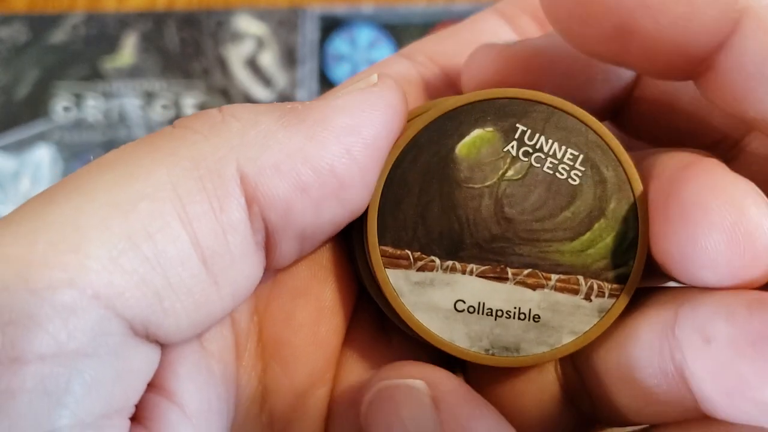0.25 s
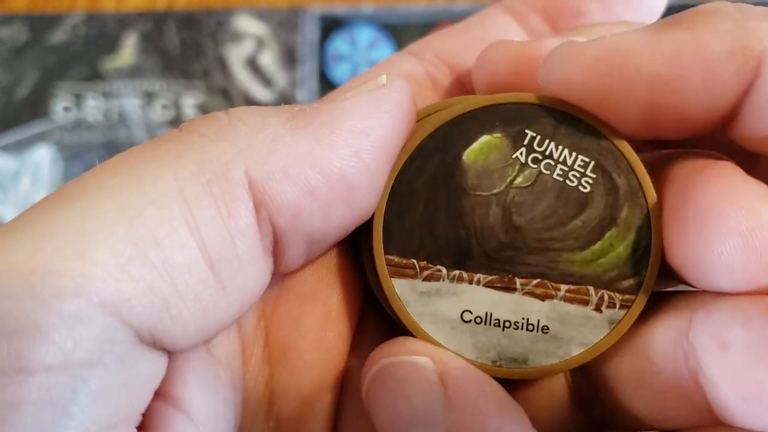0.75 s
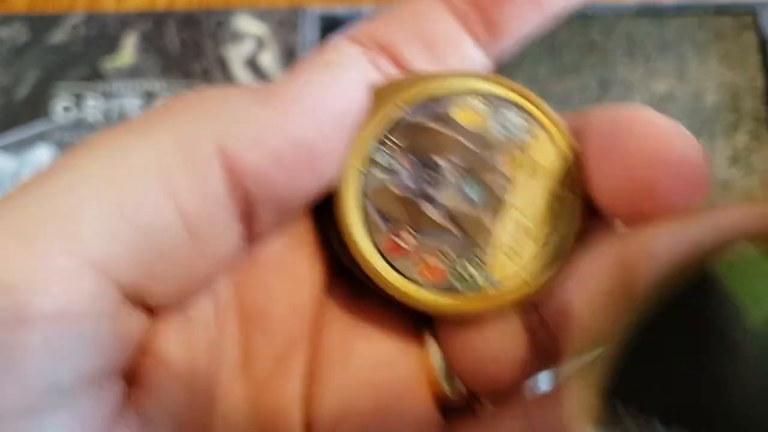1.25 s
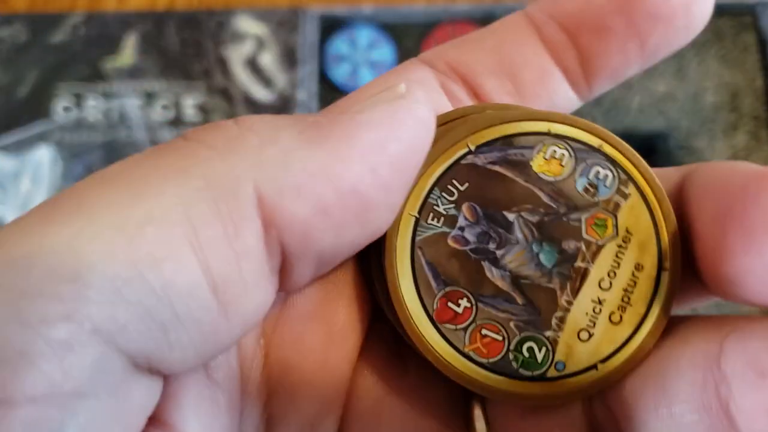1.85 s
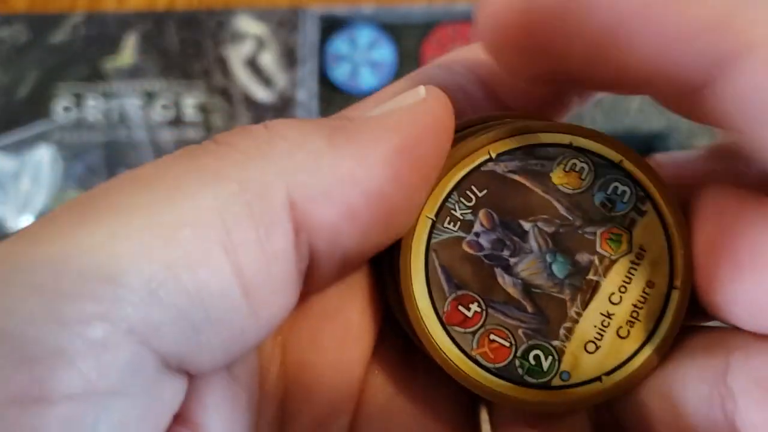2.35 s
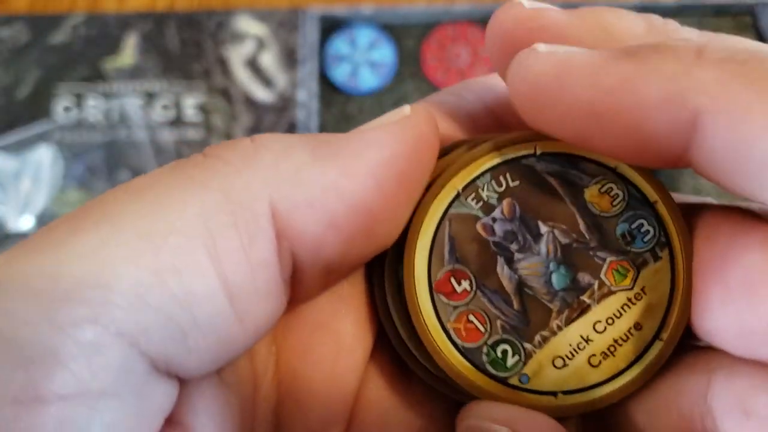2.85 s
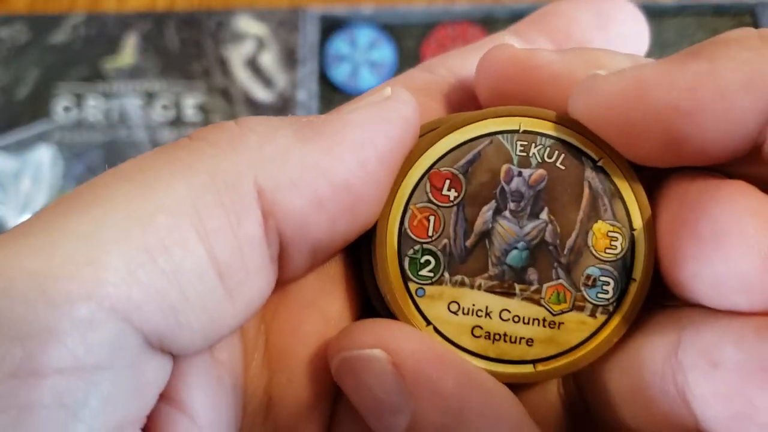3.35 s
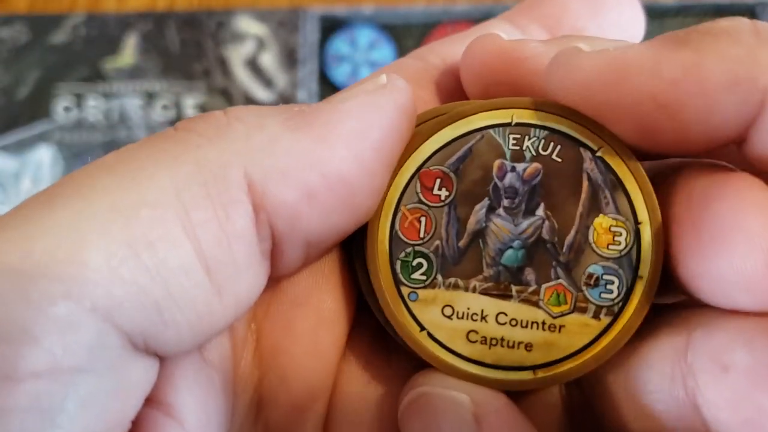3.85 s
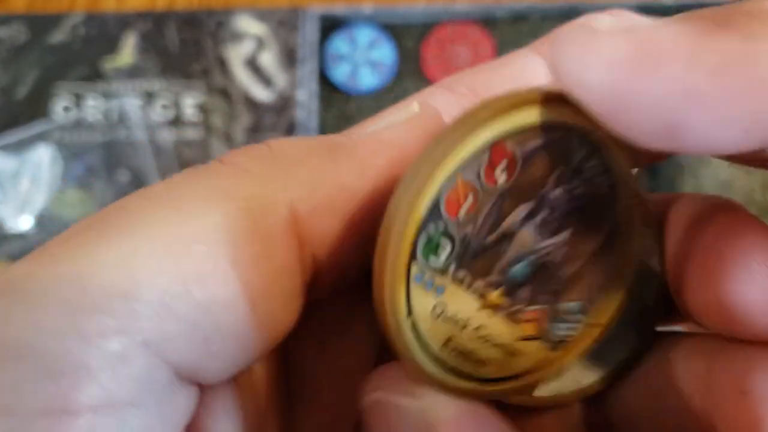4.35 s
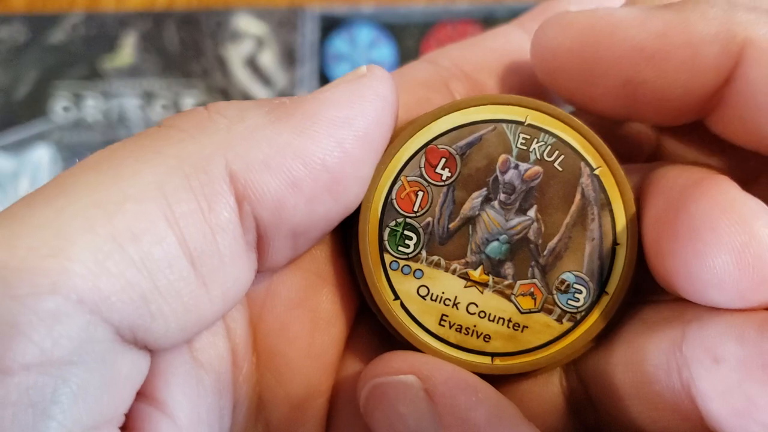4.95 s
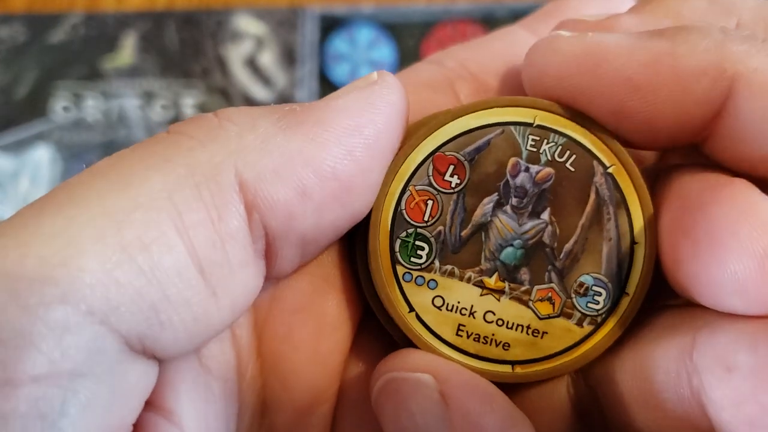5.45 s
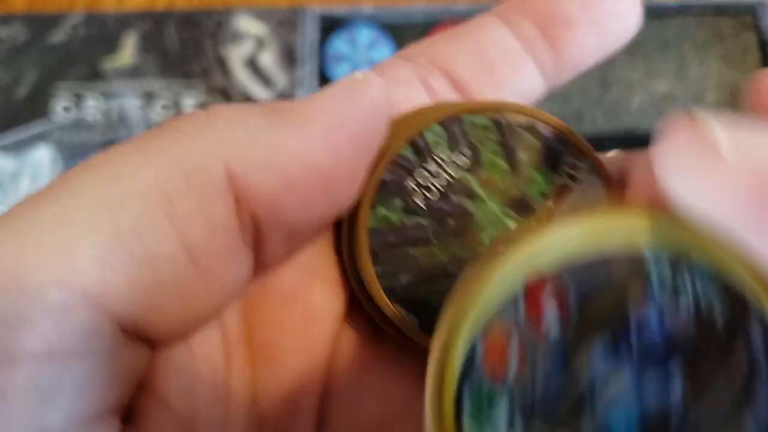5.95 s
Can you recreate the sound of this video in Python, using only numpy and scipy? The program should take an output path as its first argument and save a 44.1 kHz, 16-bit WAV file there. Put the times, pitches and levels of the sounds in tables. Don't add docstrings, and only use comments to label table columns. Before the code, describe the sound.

Thick plastic chips click and grind softly in a hand, one clatters down on a table, then loud clacks in a quiet room.

```python
import sys
import numpy as np
from scipy import signal
from scipy.fft import rfft, irfft, next_fast_len
from scipy.io import wavfile
from scipy.ndimage import uniform_filter1d

SR = 44100
rng = np.random.default_rng(int(sys.argv[2]) if len(sys.argv) > 2 else 0)


def bounce(signal):
    frames = np.transpose(np.atleast_2d(signal))
    limited = np.clip(frames, -1, 1)
    pcm = np.round(limited * 32767).astype(np.int16)
    wavfile.write(sys.argv[1], SR, pcm)


def level_to_linear(level):
    exponent = np.asarray(level, float) / 20
    return 10 ** exponent


N = 273420
HISS_TOP_HZ = 14750


def unit(x):
    return x / np.sqrt(np.mean(x ** 2) + 1e-20)


def along(points, hz):
    f, v = np.transpose(points)
    return np.interp(np.log(hz + 1), np.log(f + 1), v)


def filtered(x, response):
    size = next_fast_len(x.shape[-1] + 8192)
    spectrum = rfft(x, size) * response(np.fft.rfftfreq(size, 1 / SR))
    return irfft(spectrum, size)[..., :x.shape[-1]]


def sides(pan_db):
    return level_to_linear(np.array([pan_db, -pan_db]) / 2)


def add(track, start, x, lag=0):
    track[0, start:start + x.shape[1]] += x[0]
    track[1, start + lag:start + lag + x.shape[1]] += x[1]


def swell(peak_s, attack_s, release_s):
    t = np.arange(-round(attack_s * SR), round(release_s * SR)) / SR
    gain = level_to_linear(-30 * np.maximum(-t / attack_s, t / release_s))
    return round((peak_s + t[0]) * SR), gain


def ring(modes, seconds, spread_db, attack_s, crack_db):
    t = np.arange(round(seconds * SR)) / SR
    hz, db, t60 = np.transpose(modes)[:, :, None]
    luck = rng.standard_normal((3, 2, len(modes), 1))
    tones = np.sin(2 * np.pi * hz * (1 + 0.011 * luck[0, 0]) * t + 2 * luck[1])
    width = round(2 * SR / hz.mean())
    scrape = rng.standard_normal((2, 1, len(t)))
    for _ in range(2):
        scrape = uniform_filter1d(scrape, size=width)
    shape = level_to_linear(-60 * t / t60) + unit(scrape) * level_to_linear(crack_db - 60 * t * hz.mean() / 25)
    out = (level_to_linear(db + spread_db * luck[2]) * shape * tones).sum(1)
    out = out * (1 - np.exp(-(t / attack_s) ** 2))
    return out / np.abs(out).max(1, keepdims=True)


def lasts(modes):
    return .22 if modes[0][0] < 450 else .05


def grit(n, per_second, spread_db):
    taps = (rng.random(n) < per_second / SR) * level_to_linear(spread_db * rng.standard_normal(n))
    return unit(taps) * rng.standard_normal((2, n)) + .5 * rng.standard_normal((2, n))


def excite(force, modes, crack_db):
    modal = ring(modes, lasts(modes), spread_db=1.0, attack_s=0.00022, crack_db=crack_db)
    return unit(signal.fftconvolve(force, modal, axes=1)[:, :force.shape[1]])


# f/Hz, correlation
PORT_LIKENESS = [(60, 0.89), (130, 0.89), (290, 0.77), (640, 0.3), (1410, 0.04), (3100, 0.01),
                 (6820, -0.02), (15000, 0.02)]
# f/Hz, left-right level/dB
PORT_LEAN = [(60, -1.0), (110, 0), (200, -0.5), (380, 2), (700, 2.5), (1290, 5), (2380, 3), (4400, 3.5),
             (8120, 6.5), (15000, -4)]


def noise(spectrum):
    def mid_side(hz):
        turn = np.arccos(np.clip(along(PORT_LIKENESS, hz), -1, 1)) / 2
        return level_to_linear(along(spectrum, hz)) * [np.cos(turn), np.sin(turn)]
    mid, side = filtered(rng.standard_normal((2, N)), mid_side)
    return unit(filtered(np.array([mid + side, mid - side]), lambda hz: sides(along(PORT_LEAN, hz))))


# f/Hz, level/dB per Hz
RUMBLE_SPECTRUM = [(15, -56.5), (25, -22), (59, -4.5), (82, -1), (124, -4.5), (192, -22), (207, -13),
                   (227, -7), (248, -27), (306, -22.5), (465, -29.5), (509, -27.5), (900, -39), (1170, -70),
                   (1980, -120)]
# t/s, level/dB
RUMBLE_LEVEL = [(0.0, -68.5), (0.41, -66.5), (0.81, -71.5), (0.95, -63.5), (1.07, -68.5), (2.73, -67.5),
                (2.81, -71.5), (2.97, -65), (3.14, -68), (4.16, -70.5), (4.28, -65.5), (4.42, -70),
                (4.77, -63.5), (5.09, -68), (5.5, -67), (5.63, -70), (5.9, -70.5), (6.2, -68)]
# t/s, level/dB
MOTOR_LEVEL = [(0, -90.5), (3.9, -89.5), (4.3, -77), (5.4, -82), (5.7, -93), (6.2, -91)]
# f/Hz, level/dB per Hz
HISS_SPECTRUM = [(500, -12), (700, -6), (1500, -8.5), (3000, -10.5), (6300, -16), (7300, -8.5), (8500, -17),
                 (9500, -15), (11500, -7.5), (13900, -7), (14600, -9.5)]


def background():
    t = np.arange(N) / SR
    level = level_to_linear(np.interp(t, *np.transpose(RUMBLE_LEVEL)))
    start, shake = swell(1.96, attack_s=0.25, release_s=0.24)
    level[start:start + len(shake)] += level_to_linear(-55) * shake
    rumble = level_to_linear(2.0) * level * noise(RUMBLE_SPECTRUM)
    motor_gain = level_to_linear(np.interp(t, *np.transpose(MOTOR_LEVEL)))
    motor = motor_gain * noise([(160, -40.5), (174, -1), (190, -39.5), (300, -120)])
    drone = level_to_linear(-80) * np.sin(2 * np.pi * 222.5 * t)
    drone = drone + level_to_linear(-86) * noise([(205, -40), (222, -0.5), (240, -40.5), (400, -120)])
    hiss = level_to_linear(-76) * filtered(noise(HISS_SPECTRUM), lambda hz: hz < HISS_TOP_HZ)
    return rumble + motor + drone + hiss


# f/Hz, level/dB, t60/s
CHIP_RING = [(6220, -5, 0.009), (6960, 0, 0.016), (7190, -2, 0.014), (7680, -13.5, 0.01),
             (8070, -17, 0.0066)]
# peak t/s, hiss level/dB, attack t/s, left-right level/dB
SLIDES = [
    (1.293, -63.5, .06, -5),
    (2.452, -70.5, .05, -3),
    (3.15, -76.5, 0.11, 10),
    (3.353, -65, 0.019, -10),
    (3.62, -69, 0.19, 3.5),
    (4.428, -71, 0.12, 2),
    (4.63, -64, 0.025, 8),
]


def slides():
    out = np.zeros((2, N + SR))
    for s, db, attack_s, pan_db in SLIDES:
        start, gain = swell(s, attack_s, release_s=.13)
        force = grit(SR // 3, per_second=6000, spread_db=3.0)
        skin = unit(filtered(force, lambda hz: (hz < HISS_TOP_HZ) / (1 + (9500 / (hz + 1)) ** 6)))
        rub = skin + level_to_linear(-17) * excite(force, CHIP_RING, crack_db=-4.5)
        add(out, start, level_to_linear(db) * gain * rub[:, -len(gain):] * sides(pan_db)[:, None])
    return out[:, :N]


# from t/s, body f/Hz, body level/dB, top modes level/dB, left-right level/dB
GRIPS = [(0, 1595, -2, -7, 18), (2.4, 1680, 11, -1, 16), (2.52, 2050, 13, -14, 16.5),
         (2.72, 3690, -22, -18, 24), (2.8, 940, -25, -25, 14.5), (3.3, 1500, -7, 18, 21),
         (3.45, 2200, 6, -16.5, 12.5), (3.8, 1300, -12, -19, 13), (4.2, 2104, 10, -7, -1.5),
         (4.37, 1890, 10, 4, 5), (4.55, 2200, -10, -4, 5), (4.7, 2800, -17.5, -14, 12),
         (4.811, 2790, -20, -12.5, 6), (4.835, 3100, -21.5, -8, 8), (5.3, 3450, 2, 3, 6)]


def grip(s):
    return [row for row in GRIPS if row[0] <= s][-1][1:]


# pitch ratio to body f/Hz, level/dB, t60/s
STACK_MODES = [(.45, -4, 0.00591), (.65, -6.5, 0.0065), (.83, 2, 0.0087), (1, 5, 0.013), (1.2, -4, .008),
               (1.45, -8, .005), (1.8, -9, 0.0044)]


def body(hz):
    return [(ratio * hz, db, t60) for ratio, db, t60 in STACK_MODES]


# f/Hz, level/dB, t60/s
CHIP_FIVE = [(4590, -5, 0.0078), (4963, -3, 0.016), (5400, -3.5, 0.01), (6270, -5, 0.0065)]
# f/Hz, level/dB, t60/s
CHIP_TOP = [(9800, 0, 0.011), (10940, 2.5, 0.0045), (11990, -1.5, 0.0078), (12700, -6, .004),
            (14390, -5, 0.0065)]
# f/Hz, level/dB, t60/s
PALM = [(776, -19, 0.025), (950, -5.5, .008)]
# t/s, 7 kHz ring level/dB, 5 kHz modes over it/dB
CONTACTS = [(1.5024, -66, -19), (2.4554, -70, -16), (2.5675, -59, -2), (2.746, -55, -19), (2.8514, -82, 14),
            (3.3534, -94, 0), (3.5172, -53.5, 0.5), (3.5206, -42.5, 6.5), (3.5231, -55, 2.5),
            (3.8844, -79, 12), (4.3164, -63, -6), (4.4214, -60, -2), (4.6037, -36, 1), (4.6043, -28, 3),
            (4.6052, -37.5, 3), (4.8020, -22, -5.5), (4.8050, -22.5, -0.5), (4.8185, -12, -6),
            (4.8272, -28, 6), (4.8293, -8, -11), (4.8316, -8, -13.5), (4.8378, -21.5, -1),
            (4.8384, -12.5, 6.5), (4.8426, -23.5, 5.5), (5.7378, -48, 9.5), (5.741, -59, 9.5)]
# t/s, level/dB
PALM_SLAPS = [
    (4.822, -46.5),
    (4.840, -44),
]


def clicks():
    def hit(modes, crack_db):
        return ring(modes, 0.039, spread_db=2.0, attack_s=0.00022, crack_db=crack_db)
    out = np.zeros((2, N + SR))
    for s, db, five_db in CONTACTS:
        body_hz, body_db, top_db, pan_db = grip(s)
        blow = hit(CHIP_RING, crack_db=-7.5) + level_to_linear(five_db) * hit(CHIP_FIVE, crack_db=-4)
        held = level_to_linear(body_db) * hit(body(body_hz) + PALM, crack_db=-2)
        held += level_to_linear(top_db) * hit(CHIP_TOP, crack_db=4)
        blow += level_to_linear(max(five_db, 0)) * held
        add(out, round(s * SR), level_to_linear(db) * blow * level_to_linear([[0], [-pan_db]]), lag=14)
    for s, db in PALM_SLAPS:
        slap = ring(PALM[:1], .05, spread_db=0, attack_s=.002, crack_db=-9)
        add(out, round(s * SR), level_to_linear(db) * slap * level_to_linear([[0], [-12]]))
    return signal.sosfilt(signal.butter(3, 560, "high", fs=SR, output="sos"), out[:, :N])


# f/Hz, level/dB, t60/s
CHIP_LOW = [(1780, 1, 0.008), (2050, 3.5, 0.0074), (2520, 2, .006), (3100, -8, .004), (3600, -11, 0.0046),
            (4350, -3.5, .005)]
# f/Hz, level/dB, t60/s
TABLE_LEGS = [(138, 1, 0.16), (190, -2.5, .04)]
# f/Hz, level/dB, t60/s
TABLE_FRAME = [(264, -5.5, 0.067), (311, -6.5, 0.14), (353, -4.5, 0.087), (406, -5.5, .08)]
# f/Hz, level/dB, t60/s
TABLE_TOP = [(500, -0.5, 0.029), (650, 3.5, 0.025), (856, -4, 0.018), (1030, -7.5, 0.015),
             (1230, 0.5, 0.045), (1445, -2.5, 0.011)]
# t/s, 7 kHz ring level/dB, table level/dB, top modes level/dB
BOUNCES = [(1.8628, -18.5, 0.5, -28), (1.8705, -29, -5, -29), (1.8872, -26.5, 7.5, -16),
           (1.9084, -16, -14, -5), (1.9107, -10.5, -4.5, -15.5), (1.9156, -8, -13.5, -19.5),
           (1.9371, -13.5, -13.5, -13.5), (1.949, -23, -11, -18), (1.9675, -21.5, -4.5, -14.5),
           (1.9802, -29, -5, -13.5), (1.9943, -31, -2.5, -13), (2.013, -32, 5, -1),
           (2.0357, -29, -1.5, -17), (2.0676, -22.5, 3, 1.5), (2.0902, -30, -2, -16.5),
           (2.0951, -37.5, -3, -8.5), (2.1159, -38, 10, -2), (2.1374, -38, 5, -1)]


def bounces():
    def hit(modes):
        blow = ring(modes, lasts(modes), spread_db=4.0, attack_s=.0008, crack_db=3)
        return np.pad(blow, ((0, 0), (0, SR // 4)))[:, :SR // 4]
    out = np.zeros((2, N + SR))
    for s, db, table_db, top_db in BOUNCES:
        blow = hit(CHIP_RING) + level_to_linear(-11) * hit(CHIP_LOW + CHIP_FIVE[::2]) + level_to_linear(top_db) * hit(CHIP_TOP)
        blow += level_to_linear(table_db - 3.5) * hit(TABLE_LEGS + TABLE_FRAME + TABLE_TOP)
        pan_db = -2 + 35 * (s - BOUNCES[0][0])
        add(out, round(s * SR), level_to_linear(db + 2.5) * sides(pan_db)[:, None] * blow)
    return out[:, :N]


# t/s, level/dB
RATTLE = [
    (1.865, -32),
    (1.901, -40),
    (1.913, -24),
    (1.935, -28),
    (2.057, -38),
    (2.067, -28),
    (2.121, -35.5),
    (2.259, -71.5),
    (2.56, -112),
]


def rattle():
    out = np.zeros((2, N + SR))
    t = np.arange(SR) / SR + BOUNCES[0][0]
    chip_db = np.interp(t, *np.transpose(RATTLE), right=-200)
    extra_db = chip_db + 33
    force = grit(SR, per_second=1000, spread_db=4.5)
    chatter = level_to_linear(-39 + .42 * extra_db) * excite(force, TABLE_FRAME, crack_db=-6.0)
    chatter += level_to_linear(-35.5 + 0.76 * extra_db) * excite(force, TABLE_TOP, crack_db=3.5)
    chatter += level_to_linear(chip_db - 4) * excite(force, CHIP_RING, crack_db=-3.0)
    chatter += level_to_linear(chip_db - 1) * excite(force, CHIP_LOW + CHIP_FIVE[::2], crack_db=5.5)
    top_db = chip_db - 15.5 + 1.4 * np.maximum(extra_db, -5)
    chatter += level_to_linear(top_db) * excite(force, CHIP_TOP, crack_db=3.0)
    add(out, round(t[0] * SR), chatter)
    return out[:, :N]


# t/s, level/dB
SETTLING_TAPS = [
    (2.246, -59),
    (2.305, -56),
    (2.365, -62.5),
    (2.43, -73),
]


def settling():
    out = np.zeros((2, N + SR))
    for s, db in SETTLING_TAPS:
        tap = ring(TABLE_TOP[3:5], 0.19, spread_db=2, attack_s=0.0058, crack_db=-2)
        add(out, round(s * SR), level_to_linear(db) * tap)
    return out[:, :N]


def dropped():
    return filtered(bounces() + rattle() + settling(),
                    lambda hz: 1 / (1 + (105 / (hz + 1)) ** 4) / (1 + (hz / 14600) ** 40))


# peak t/s, 5 kHz modes level/dB, body over it/dB, 7 kHz ring over it/dB, release t/s
GRINDS = [(2.584, -86, 20, 10, 0.04), (2.594, -64, -7.5, -10.5, 0.045), (2.652, -71.5, -27, -9, .07),
          (2.862, -65.5, -8.5, -15, .035), (3.088, -71.5, -8.5, -3.5, 0.039), (3.15, -68.5, -8.5, -6, .09),
          (3.541, -79.5, 12.5, 4.5, .05), (3.59, -85.5, -8, 12.5, .2), (3.888, -84, -3, -14, .07),
          (4.423, -75, 11, 7.5, 0.057), (4.63, -65, -3.5, 2, .12), (4.74, -81, -12, 6, 0.1984),
          (5.765, -76.5, 6.5, 2, 0.11)]


def grinds():
    out = np.zeros((2, N + SR))
    for s, db, body_db, ring_db, release_s in GRINDS:
        start, gain = swell(s, .03, release_s)
        body_hz, _, _, pan_db = grip(s)
        force = grit(SR // 3, per_second=5400, spread_db=2.5)
        rub = level_to_linear(body_db) * excite(force, body(body_hz), crack_db=1.5)
        rub += excite(force, CHIP_FIVE[1:2], crack_db=-2.5)
        rub += level_to_linear(ring_db) * excite(force, CHIP_RING, crack_db=-5.5)
        add(out, start, level_to_linear(db) * gain * rub[:, -len(gain):] * sides(pan_db)[:, None])
    return out[:, :N]


# f/Hz, t60/s
ROOM_DECAY = [(200, 0.33), (600, .22), (1500, 0.3), (3000, .27), (6000, 0.18), (10000, .25), (15000, 0.098)]


def room(x, delay_s):
    out, hop = np.zeros((2, N + SR)), SR // 10
    for start in range(0, N, hop):
        piece = x[:, start:start + hop].mean(0)
        if np.abs(piece).max() > 1e-9:
            hz, t, z = signal.stft(rng.standard_normal((2, SR // 3)), SR, nperseg=256)
            decay = level_to_linear(-60 * t / along(ROOM_DECAY, hz)[:, None])
            tail = signal.istft(z * decay, SR, nperseg=256)[1]
            tail = tail * (1 - np.exp(-np.arange(tail.shape[1]) / SR / 0.0067))
            answer = signal.fftconvolve(piece[None], tail / np.linalg.norm(tail[0]), axes=1)
            add(out, start + round(delay_s * SR), answer)
    return out[:, :N]


# centre f/Hz, inner width f/Hz, outer width f/Hz
PORT_DIP = (8700, 320, 1200)
# f/Hz, side level/dB
PORT_WIDTH = [(60, -10.5), (130, -17.5), (300, -9.5), (600, -3), (1500, 1)]


def ports(x):
    dip_hz, inner_hz, outer_hz = PORT_DIP

    def mid_side(hz):
        stiff = dip_hz ** 2 - hz * hz
        dip = (stiff + 1j * hz * inner_hz) / (stiff + 1j * hz * outer_hz)
        narrow = np.minimum(level_to_linear(along(PORT_WIDTH, hz)), 1)
        return dip * [np.sqrt(2 - narrow ** 2), narrow]
    mid, side = filtered(np.array([x[0] + x[1], x[0] - x[1]]) / 2, mid_side)
    return signal.sosfilt(signal.butter(10, 15000, fs=SR, output="sos"), [mid + side, mid - side])


def scene():
    hand, table = slides() + clicks() + grinds(), dropped()
    hand_room = level_to_linear(-15) * room(hand, delay_s=0.0067)
    table_room = level_to_linear(-6.0) * room(table, delay_s=.004)
    return ports(hand + hand_room + table + table_room) + background()


def top_cut(x):
    return signal.sosfilt(signal.butter(12, 16480, fs=SR, output="sos"), x)


def record(dry):
    return top_cut(dry)


dry = scene()
out = record(dry)
bounce(out)
```